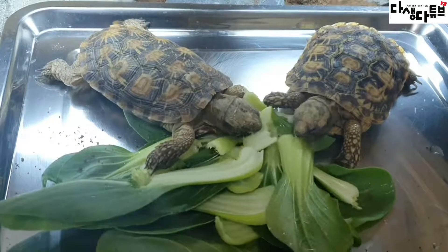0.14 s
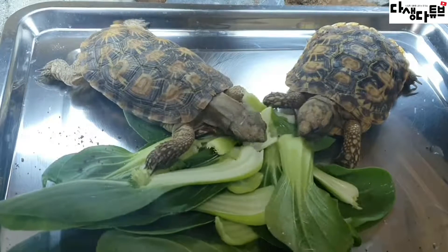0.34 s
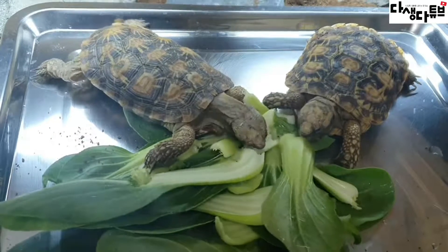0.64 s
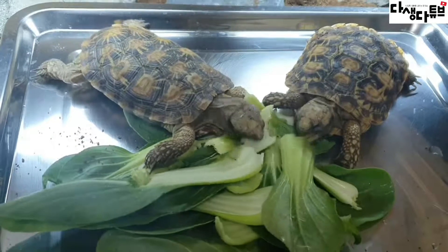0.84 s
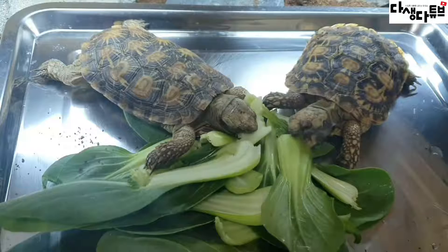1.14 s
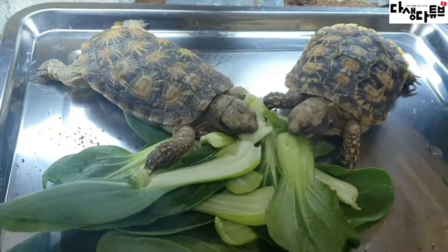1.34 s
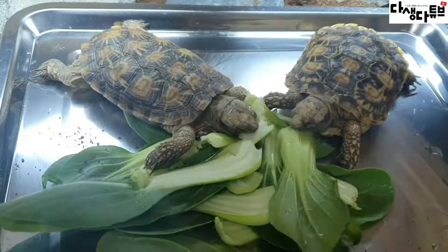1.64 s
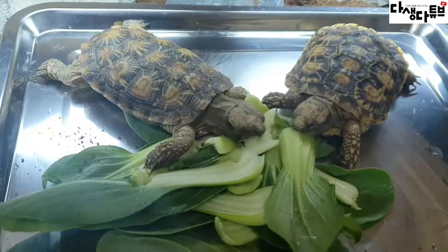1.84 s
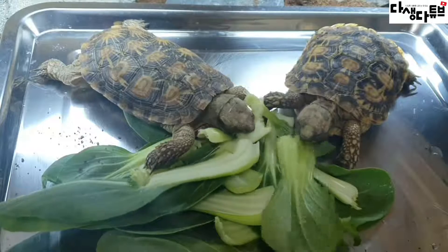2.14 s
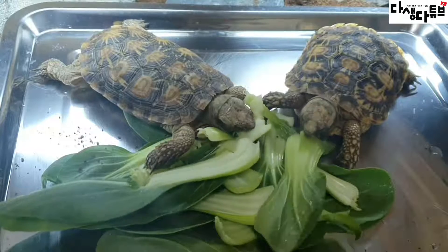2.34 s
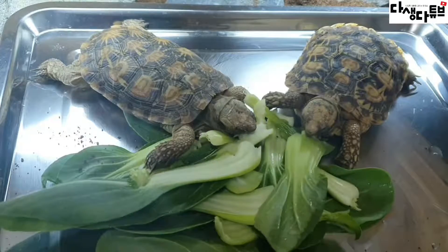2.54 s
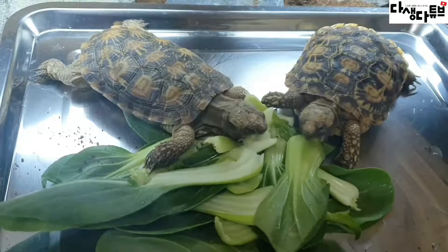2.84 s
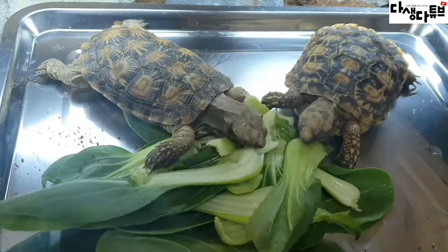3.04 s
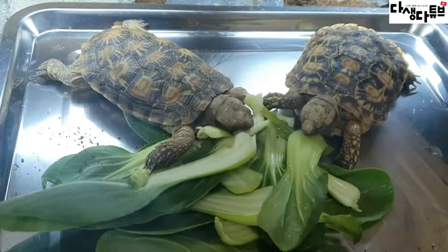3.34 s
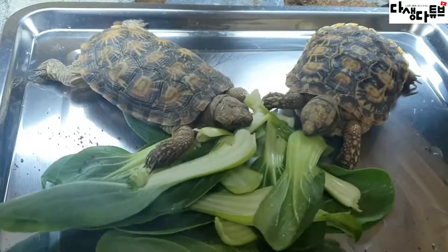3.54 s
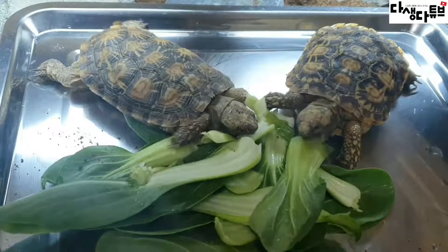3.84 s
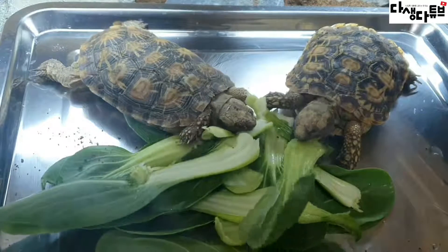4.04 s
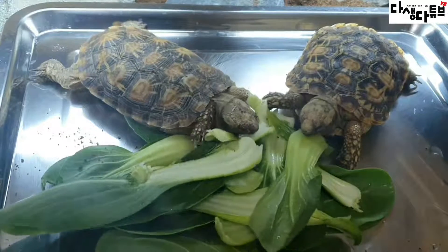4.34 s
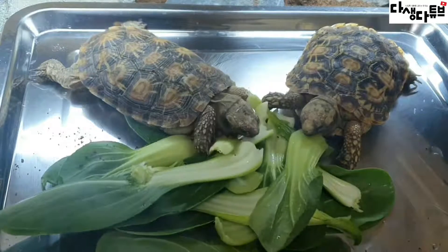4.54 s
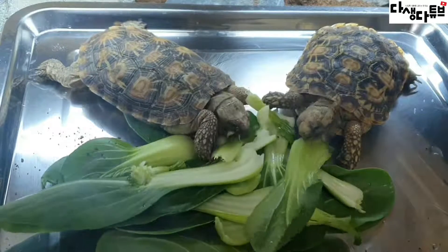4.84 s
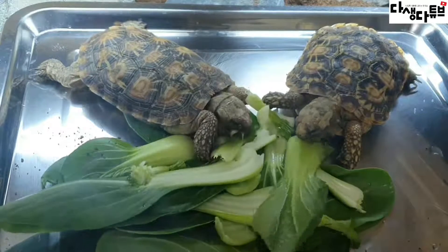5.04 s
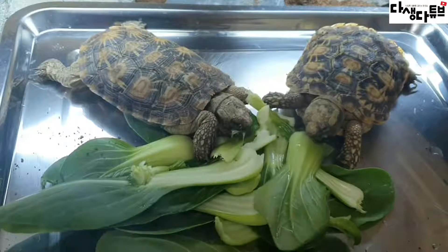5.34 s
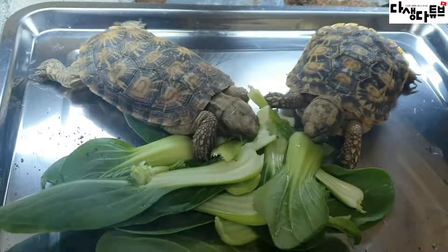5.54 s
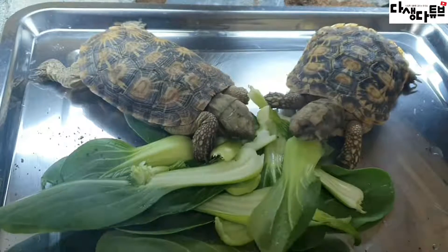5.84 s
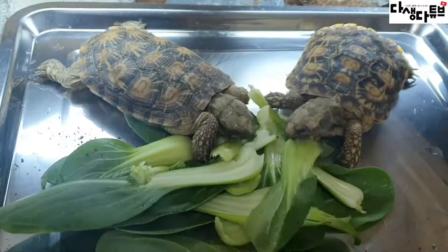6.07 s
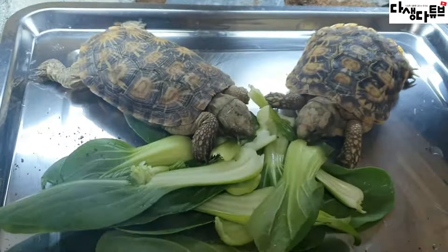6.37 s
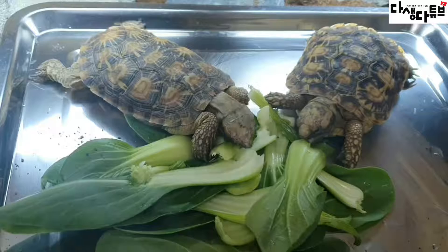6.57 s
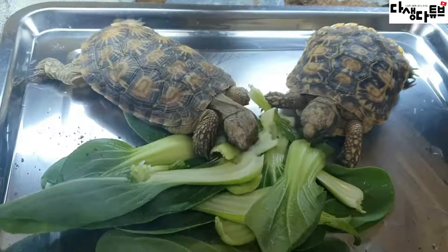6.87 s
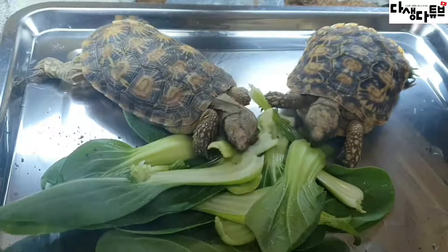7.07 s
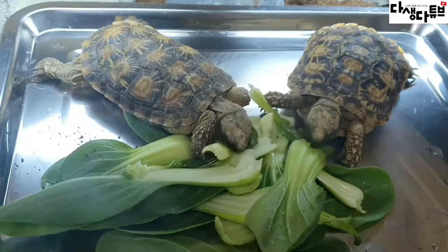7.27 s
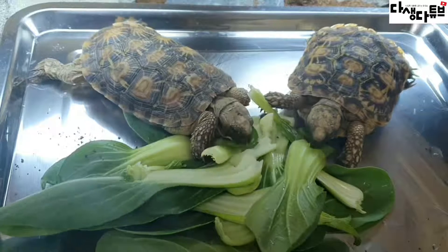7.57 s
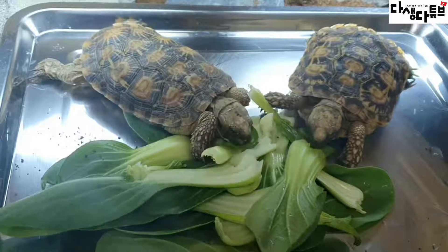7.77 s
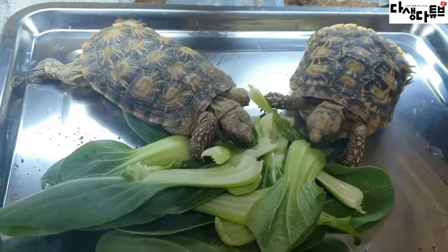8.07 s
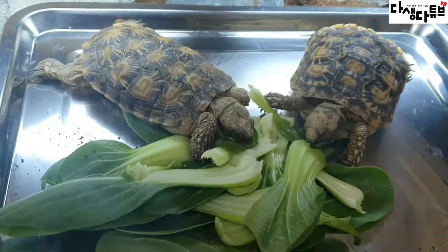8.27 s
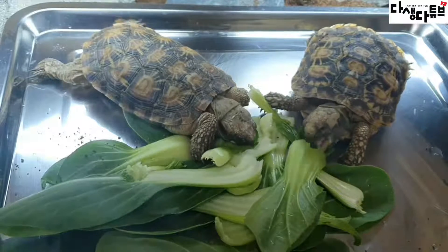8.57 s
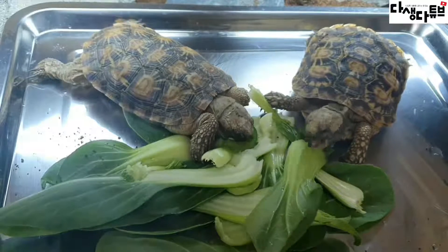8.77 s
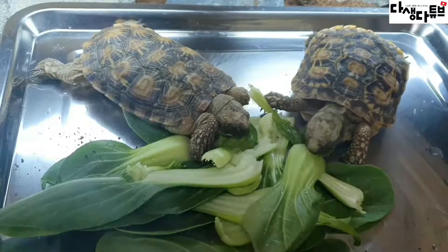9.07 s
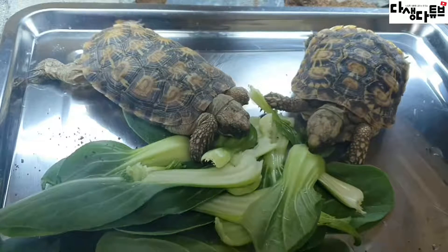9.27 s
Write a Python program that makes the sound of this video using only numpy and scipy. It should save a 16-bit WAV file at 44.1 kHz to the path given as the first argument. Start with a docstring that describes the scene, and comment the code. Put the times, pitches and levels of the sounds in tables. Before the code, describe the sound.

Very close, dry stereo: tortoise jaws on wet greens at left, a steel tray at right. A tiny bite opens over a faint wavering low drone and leafy wash on the left and a soft steady rumble on the right. Around 0.5 seconds comes a juicy bite and soft pop, with a dull knock. From 1.2 to 2.7 crisp crunches and bright snaps come in quick clusters, with small crackles. After a lull, a strong tearing crunch, snap and hollow pop at 3.4-3.7. Another sharp crunch at 4.4-4.6 with a thump. From 5.2 to 5.6 hollow pops and several deep tray knocks, the loudest near 5.5; then drone and wash cut off. It is sparser afterwards: a bite and pop at 6.6, a tiny squeak at 7.2, light rustles, soft thuds around 7.6, 8.2 and 8.7, and a faint last bite at 9.4.

```python
"""A crisp bite over a wavering low drone and faint leafy wash on the left, and a soft rumble on the right.
Two tortoises eat crisp leafy greens in a steel tray, very close to the microphones. On the left, bites
are shaped noise in three bands (pulp, fibre, skin) with tiny decaying sines as crackle; snaps and pops
are resonant noise bursts. On the right, dull tray knocks are swelling sines of sagging pitch.
Drone and wash sink together and stop; bites, light leaf rustles and knocks go on."""
import sys
import numpy as np
from scipy import signal
from scipy.fft import rfft, irfft, next_fast_len
from scipy.io import wavfile
from scipy.ndimage import uniform_filter1d, map_coordinates

SR = 44100
rng = np.random.default_rng(int(sys.argv[2]) if len(sys.argv) > 2 else 0)


def put_to_file(sound):
    """Save the sound as 16-bit audio at rate SR, in the file named by the first command-line argument."""
    columns = np.atleast_2d(sound).T  # one column per channel
    safe = np.clip(columns, -1, 1)
    whole_steps = np.round(safe * 32767)
    wavfile.write(sys.argv[1], SR, whole_steps.astype(np.int16))


N = 414969

# bites: start_s, length_s, level_db, rise_db (over the length, as the jaws squeeze),
# crispness_db (+ thin skin, - juicy pulp)
BITE_ROWS = [(0.0, 0.031, -54.5, -1, -2), (0.495, 0.17, -56, 3, -4.5), (0.747, 0.024, -55.5, -4.5, 0),
             (1.179, 0.11, -54.5, 8, 3.5), (1.338, 0.039, -48, -1.5, 3.5), (1.41, 0.093, -55.5, -11, -7),
             (1.688, 0.085, -52, 7, -1), (1.826, 0.03, -48.5, 2, 2), (1.908, 0.047, -48, -2.5, -1),
             (2.413, 0.018, -52, 4, 1), (2.482, 0.038, -51, 2, 1.5), (2.584, 0.052, -49, -5.5, 0.5),
             (2.68, 0.045, -49.5, 4.5, 3), (3.419, 0.075, -52.5, -1, 4), (3.498, 0.16, -45, 5.5, 2.5),
             (4.432, 0.03, -44, 7, -2), (4.512, 0.066, -49.5, -1.5, 1.5), (5.16, 0.033, -55.5, 3, 4),
             (5.21, 0.044, -58.5, 2, -8), (5.397, 0.073, -50, -5, -0.5), (5.503, 0.046, -49.5, -8, -0.5),
             (6.495, 0.035, -52.5, 7.5, 0.5), (6.573, 0.079, -52, -7, -6.5), (7.622, 0.043, -59.5, -4, -4),
             (9.39, 0.037, -57, 0, 0)]
# spectrum of the low rumble: frequency_hz, level_db
RUMBLE_SPECTRUM = [(15, -26), (30, -7), (45, 0.5), (70, 0), (100, -9), (135, -19), (240, -25), (600, -54)]
# spectrum of the background hiss: frequency_hz, level_db
HISS_SPECTRUM = [(400, 12.5), (1000, 11.5), (2500, 6), (7000, -1), (13000, 0), (16000, -8)]


def amp(db):
    """Decibels to amplitude factor."""
    return 10 ** (np.asarray(db) / 20)


def unit(x):
    """x scaled to rms 1."""
    return x / np.sqrt(np.mean(x ** 2) + 1e-20)


def wobble(knots_per_s):
    """A smooth random curve through normally distributed knots."""
    knots = rng.standard_normal(int(N * knots_per_s / SR) + 4)
    return map_coordinates(knots, [np.arange(N) * knots_per_s / SR])


def filtered(x, response):
    """x times a response of frequency, with zero padding."""
    n = x.shape[-1]
    padded = next_fast_len(n + 8192)
    spectrum = rfft(x, padded) * response(np.fft.rfftfreq(padded, 1 / SR))
    return irfft(spectrum, padded)[..., :n]


def shaped(x, points):
    """x shaped by (Hz, dB) points on a log frequency axis."""
    point_hz, point_db = np.transpose(points)
    return filtered(x, lambda hz: amp(np.interp(np.log(hz + 1), np.log(point_hz), point_db)))


def coloured(x, points):
    """x given a spectrum, at rms 1."""
    return unit(shaped(x, points))


def resonant(x, centre_hz, q):
    """x through one second-order resonance, at rms 1."""
    return unit(filtered(x, lambda f: 1j * f / (centre_hz ** 2 - f * f + 1j * f * centre_hz / q)))


def noise(spectrum):
    """Steady noise of rms 1."""
    return coloured(rng.standard_normal(N), spectrum)


def add(track, start_s, sound):
    """Mix a sound into the track at a time."""
    start = max(round(start_s * SR), 0)
    track[start:start + len(sound)] += sound[:max(N - start, 0)]


def bursts(n, rate_per_s, spread_db):
    """Impulses of random sign, size and moment, at rms 1."""
    spread = amp(spread_db * np.minimum(rng.exponential(size=n), 4))
    size = rng.standard_normal(n) * spread
    return unit(size * (rng.random(n) < rate_per_s / SR))


def patchy(x, narrow_db, broad_db):
    """Random gains, broad and narrow in frequency, vary the colour from moment to moment."""
    z = signal.stft(x, nperseg=1024)[2]
    field = uniform_filter1d(rng.standard_normal(z.shape), size=4, axis=1)
    broad = uniform_filter1d(field, size=25, axis=0)
    narrow = uniform_filter1d(field, size=3, axis=0) - broad
    gain_db = narrow_db * np.tanh(unit(narrow)) + broad_db * np.tanh(unit(broad))
    return signal.istft(z * amp(gain_db), nperseg=1024)[1][:len(x)]


def strokes(rows, attack_db_per_s, release_db_per_s):
    """Each stroke takes hold, changes level over its length and lets go; powers of strokes add."""
    t, power = np.arange(N) / SR, np.zeros(N)
    for start_s, length_s, level_db, rise_db in rows:
        near = slice(max(int((start_s - .5) * SR), 0), int((start_s + length_s + 1) * SR))
        u = t[near] - start_s
        held_db = level_db + rise_db * (np.clip(u / length_s, 0, 1) - .5)
        attack_db = attack_db_per_s * np.maximum(-u, 0)
        release_db = release_db_per_s * np.maximum(u - length_s, 0)
        power[near] += amp(held_db - attack_db - release_db) ** 2
    return np.sqrt(power)


def wash_on():
    """Gate of the left wash and drone: one, then a short linear fade to nothing."""
    end_s, fade_s = 5.6, 0.054
    return np.clip((end_s - np.arange(N) / SR) / fade_s + 1, 0, 1)


def wash():
    """Level of wash and drone, sinking slowly before it stops."""
    sink_db_per_s = 1.0
    return wash_on() * amp(-sink_db_per_s * np.arange(N) / SR)


def left_hiss():
    """Faint hiss with shifting colour and an unsteady level."""
    return amp(-73.0 + 2.4 * wobble(17)) * patchy(noise(HISS_SPECTRUM), narrow_db=3, broad_db=2)


def right_hiss():
    """Fainter hiss with a slower drift in level."""
    return amp(-77.5 + 1.7 * wobble(5.1)) * noise(HISS_SPECTRUM)


def tray_rumble():
    """Soft low noise whose level drifts slightly."""
    return amp(-50.0 + 0.58 * wobble(2.025)) * noise(RUMBLE_SPECTRUM)


def drone(floor_db=-81):
    """Resonant low noise wavers along with the wash, over a faint rumble that stays."""
    rumble_db, drone_db, drone_hz, drone_q = -57, -54, 53.6, 6.6
    hum = amp(drone_db) * resonant(noise(RUMBLE_SPECTRUM), drone_hz, drone_q)
    low = amp(rumble_db) * noise(RUMBLE_SPECTRUM) + hum
    return wash() * low + amp(floor_db) * noise(RUMBLE_SPECTRUM)


def sway(late_db=-22):
    """Bites rock the leaf pile as low noise; the rocking is faint once the wash has stopped."""
    # spectrum of the heaving pile: frequency_hz, level_db
    heave_spectrum = [(15, -33), (55, 2), (135, -15.5), (260, -15.5), (600, -48)]
    middling_bite_db, sway_db = -50, -46
    growth = 0.65  # dB of sway per dB of bite
    tugs = []
    for start_s, length_s, level_db, rise_db, _ in BITE_ROWS:
        tug_db = sway_db + growth * (level_db - middling_bite_db)
        tugs.append((start_s, length_s, tug_db, growth * rise_db))
    rocking = strokes(tugs, attack_db_per_s=225, release_db_per_s=161)
    return amp(late_db * (1 - wash_on())) * rocking * noise(heave_spectrum)


def knocks(bend=2.03, settle_s=0.0036, sharpness=1.51, overtone_hz=245):
    """The loaded tray floor flexes as its pitch sags; hard knocks are higher, with overtone and scuff."""
    # knocks on the tray: start_s, level_db, hardness (0-1), swell_s (to the peak; also sets the decay)
    knock_rows = [(0.62, -16, 0.04, .013), (0.705, -30, 0, 0.015), (0.789, -28, 0.05, 0.012),
                  (1.413, -30, 0.17, 0.012), (3.38, -24.5, 0.37, 0.016), (4.590, -14, 0.55, 0.01),
                  (5.266, -21.5, 0.2, 0.011), (5.360, -17, 0.66, 0.011), (5.487, -6.5, 0.42, 0.0081),
                  (5.59, -17.5, 0.61, 0.0074), (7.356, -28.5, 0, 0.016), (7.576, -16.5, 0.11, 0.011),
                  (7.614, -20.5, 0.08, 0.012), (7.919, -27, 0, 0.01), (8.182, -19, .05, .015),
                  (8.218, -23, 0.1, 0.01), (8.712, -21, 0.43, 0.012)]
    soft_hz, hard_rise_hz = 57.7, 16  # settled pitch of the softest knock, and what full hardness adds
    scuff_spectrum = [(150, 1.5), (350, -3), (700, -15.5), (1000, -23), (12000, -37.5)]  # (Hz, dB)
    out, t = np.zeros(N), np.arange(SR // 6) / SR
    for start_s, level_db, hardness, swell_s in knock_rows:
        settled_hz = soft_hz + hard_rise_hz * hardness
        # the pitch starts at (1 + bend) times its settled value
        turns = settled_hz * (t + bend * settle_s * (1 - np.exp(-t / settle_s)))
        u = t / swell_s
        flex = (u * np.exp(1 - u)) ** sharpness * np.sin(2 * np.pi * turns)
        overtone = np.sin(2 * np.pi * overtone_hz * t) * amp(-7 - 60 * t / 0.055)
        scuff = coloured(rng.standard_normal(len(t)), scuff_spectrum) * amp(-22.0 - 60 * t / 0.14)
        onset = np.minimum(t / 0.0065, 1)
        add(out, start_s, amp(level_db) * (flex + hardness * (overtone + scuff) * onset))
    return out


def squeak(waver=.07, rasp_db=1, edge_db_per_s=3500, tail_db=-11, tail_db_per_s=210):
    """A beak sticks and slips on wet stalk for an instant: a wavering chirp with a raspy tail."""
    # spectrum of the rasp: frequency_hz, level_db
    rasp_spectrum = [(2000, -18), (2400, 1), (4300, -11), (12000, -29)]
    start_s, length_s, level_db, pitch_hz = 7.166, 0.01, -49, 2610
    turns = np.cumsum(pitch_hz * (1 + waver * wobble(400))) / SR
    slip = [(start_s, length_s, level_db, 0)]
    grip = strokes(slip, edge_db_per_s, edge_db_per_s)
    tail = amp(tail_db) * strokes(slip, 900, tail_db_per_s)
    chirp = unit(np.sin(2 * np.pi * turns)) * grip
    return chirp + amp(rasp_db) * noise(rasp_spectrum) * np.maximum(grip, tail)


def fracture(t60_s, lead_s, lead_db, tail_db, tail_t60_s):
    """Noisy cracks gather for the lead, the tissue breaks at once, and the tear dies away."""
    t = np.arange(SR // 4) / SR - lead_s
    before = amp(lead_db - 20 * np.abs(t) / lead_s)
    after = amp(-60 * np.abs(t) / t60_s) + amp(tail_db - 60 * np.abs(t) / tail_t60_s)
    cracks = bursts(len(t), 6000, 0.81) + rng.standard_normal(len(t))
    return np.where(t < 0, before, after) * cracks


def pops(lead_s=0.00329, q=1.34):
    """Thick, wet stalk gives way with a hollow pop, a fracture through two equal resonances."""
    # thick stalk giving way: start_s, level_db, pitch_hz, t60_s
    pop_rows = [(0.553, -43.5, 513, 0.089), (1.848, -38.5, 300, 0.18), (2.619, -37, 447, .08),
                (3.68, -35.5, 372, 0.23), (5.2, -31.5, 416, 0.14), (5.388, -30.5, 427, 0.38),
                (5.505, -33, 510, 0.19), (6.595, -35, 493, 0.29)]
    out = np.zeros(N)
    for start_s, level_db, pitch_hz, t60_s in pop_rows:
        run = fracture(t60_s, lead_s, lead_db=-6, tail_db=-14, tail_t60_s=.12)
        pop = resonant(resonant(run, pitch_hz, q), pitch_hz, q)
        add(out, start_s - lead_s, amp(level_db - 21.0) * pop)
    return out


def snaps(q=3.2):
    """Ragged rib breaks tear slowly over a wide band; clean ones are sudden and ring at their pitch."""
    # ribs that snap: start_s, level_db, pitch_hz, broad (share of the broad crack, 0-1)
    snap_rows = [(1.262, -36.5, 2870, 0.92), (1.34, -27.5, 3550, 0.93), (1.368, -31, 2280, 0.83),
                 (1.683, -40, 5530, 0.88), (1.757, -37.5, 5440, .7), (1.848, -40, 2300, .9),
                 (1.913, -26, 2550, 0.94), (2.3626, -46, 1430, 0.04), (2.495, -36.5, 1690, 0.65),
                 (2.565, -41.5, 2530, .4), (2.705, -29, 10700, 0.2), (2.706, -39, 2370, .2),
                 (3.226, -47.5, 1550, 0.34), (3.384, -44.5, 3530, .2), (3.638, -42, 6200, 0.1),
                 (3.65, -29, 3140, 0.81), (4.314, -49.5, 2740, 0.4), (4.458, -39.5, 2400, 0.94),
                 (4.521, -29, 3270, 0.48), (4.948, -47.5, 3530, 0.4), (5.387, -42.5, 3170, 0.3),
                 (5.522, -35.5, 2450, 0.7), (7.541, -56.5, 3220, 0), (7.587, -46, 3220, 0.36)]
    # spectrum of the broad crack: frequency_hz, level_db
    crack_spectrum = [(200, -17), (1000, -2.5), (2800, -11.5), (7000, -2), (16000, -12.5)]
    out = np.zeros(N)
    for start_s, level_db, pitch_hz, broad in snap_rows:
        lead_s = .01 + .026 * broad
        rib = fracture(.036, lead_s, lead_db=-12, tail_db=-9, tail_t60_s=.14)
        tear = fracture(.05, lead_s, lead_db=-8, tail_db=-8, tail_t60_s=.15)
        rib_q = q / (1 + 3 * broad)
        ring = resonant(resonant(rib, pitch_hz, rib_q), pitch_hz, rib_q)
        snap = ring + broad * coloured(tear, crack_spectrum)
        add(out, start_s + .0005 - lead_s, amp(level_db - 20.0) * snap)
    return out


def biting(name):
    """How strongly bites work one tissue: a quick release, then the torn leaf creaks as it settles."""
    # each tissue's answer to a bite: level_db, crispness_share, attack_db_per_s, release_db_per_s
    bite_response = {"pulp": (-1, -0.7, 316, 161), "fibre": (0.76, 0.5, 447, 350),
                     "skin": (-1.5, 1.46, 490, 375)}
    settle_db, settle_db_per_s = -7, 159
    tissue_db, crispness_share, attack_db_per_s, release_db_per_s = bite_response[name]
    rows = []
    for start_s, length_s, level_db, rise_db, crispness_db in BITE_ROWS:
        rows.append((start_s, length_s, level_db + tissue_db + crispness_share * crispness_db, rise_db))
    bite = strokes(rows, attack_db_per_s, release_db_per_s)
    settling = amp(settle_db) * strokes(rows, attack_db_per_s, settle_db_per_s)
    return np.maximum(bite, settling)


def crackle(spread_db=0.5, span_octaves=1.528):
    """Single veins break at random as the jaws squeeze, each a tiny decaying sine of its own pitch."""
    level_db, rate_per_s, centre_hz, decay_cycles = 0.5, 110, 3410, 5.1
    out, t = np.zeros(N), np.arange(SR // 100) / SR
    force = biting("fibre")
    for place, pitch, size in rng.random((int(rate_per_s * N / SR), 3)):
        at = int(place * N)
        cycles = t * centre_hz * 2 ** (span_octaves * (2 * pitch - 1))
        strength = force[at] * amp(level_db - spread_db * np.log(max(size, .05)))
        add(out, at / SR, strength * np.sin(2 * np.pi * cycles) * np.exp(-cycles / decay_cycles))
    return out


def rustling():
    """Level of leaves dragged and nudged between bites."""
    # drags and nudges: start_s, length_s, level_db
    rustle_rows = [(0.969, 0.31, -62), (2.115, 0.13, -70.5), (3.22, 0.011, -64.5), (4.215, 0.27, -65),
                   (4.961, 0.064, -66.5), (6.118, 0.64, -68.5), (7.202, 0.069, -71), (7.34, 0.026, -63.5),
                   (7.484, 0.073, -69), (9.116, 0.24, -71)]
    edge_db_per_s = 182
    rows = [(start_s, length_s, level_db, 0) for start_s, length_s, level_db in rustle_rows]
    return strokes(rows, edge_db_per_s, edge_db_per_s)


def smacking():
    """Level of small wet smacks of the jaws."""
    # smacks: start_s, level_db
    smack_rows = [(.635, -52.5), (2.12, -59.5), (2.19, -62), (5.615, -58.5), (6.727, -63), (8.045, -61.5)]
    length_s, edge_db_per_s = 0.0055, 598
    rows = [(start_s, length_s, level_db, 0) for start_s, level_db in smack_rows]
    return strokes(rows, edge_db_per_s, edge_db_per_s)


def tissue(spectrum, rate_per_s, rub, broad_db):
    """Bursting cells over the rub of wet leaf, at rms 1."""
    cells = bursts(N, rate_per_s, spread_db=-0.5) + rub * rng.standard_normal(N)
    flutter = amp(1.23 * wobble(170))
    return coloured(patchy(cells, narrow_db=7.3, broad_db=broad_db) * flutter, spectrum)


def chewing(catch_db=1.0, catch_per_s=35):
    """Pulp squelches low, fibres crackle mid, thin skin fizzes on top; the leaf catches and slips."""
    # spectra of soft pulp, tearing fibre and thin skin: frequency_hz, level_db
    pulp_spectrum = [(110, -15), (220, -0.5), (430, -0.5), (720, -2.5), (1050, -6), (1400, -7.5),
                     (2200, -35.5)]
    fibre_spectrum = [(800, -56), (1400, -2), (2400, -2), (6000, -7), (10000, -39)]
    skin_spectrum = [(3000, -28), (5400, -6.5), (7000, 2), (13500, -3), (16000, -9)]
    # each tissue's share of the background: rustle_db (relative to the rustle), wash_db
    background_levels = {"pulp": (-0.05, -67), "fibre": (0, -82), "skin": (-8.5, -80.5)}
    tissues = {"pulp": tissue(pulp_spectrum, rate_per_s=900, rub=1.0, broad_db=2.0),
               "fibre": tissue(fibre_spectrum, rate_per_s=1000, rub=1.0, broad_db=2.0),
               "skin": tissue(skin_spectrum, rate_per_s=2200, rub=0.85, broad_db=5.5)}
    drag, smack = rustling(), smacking()
    smacked = {"pulp": 0, "fibre": amp(-5) * smack, "skin": smack}
    out = np.zeros(N)
    for name, sound in tissues.items():
        rustle_db, wash_db = background_levels[name]
        power = biting(name) ** 2 + smacked[name] ** 2
        power = power + (amp(rustle_db) * drag) ** 2 + (amp(wash_db) * wash()) ** 2
        out += sound * np.sqrt(power)
    return out * amp(catch_db * wobble(catch_per_s))


def eating():
    """All that is eaten, coloured by the hollow between shells, leaves and tray."""
    # response of the hollow: frequency_hz, gain_db
    hollow_response = [(1100, -0.5), (1800, -3), (2650, 1.5), (3600, 0.5), (4500, -4), (6300, 1),
                       (8000, -1)]
    return shaped(chewing() + crackle() + snaps() + pops() + squeak(), hollow_response)


def phase_blurred(x):
    """x with random phase in every short frame: similar colour, blurred in time."""
    z = signal.stft(x, nperseg=256)[2]
    blurred = z * np.exp(2j * np.pi * rng.random(z.shape))
    return signal.istft(blurred, nperseg=256)[1][:len(x)]


def scene():
    """Eating is close on the left; the tray is on the right, with the eating faint and blurred."""
    meal = eating()
    left = left_hiss() + drone() + sway() + meal
    right = right_hiss() + tray_rumble() + amp(-5.5) * sway() + knocks() + amp(-33.0) * phase_blurred(meal)
    return np.array([left, right])


def record(dry):
    """Nothing is kept above the band limit."""
    top_hz = 15650
    return filtered(dry, lambda hz: hz < top_hz)


dry = scene()
out = record(dry)
put_to_file(out)
```